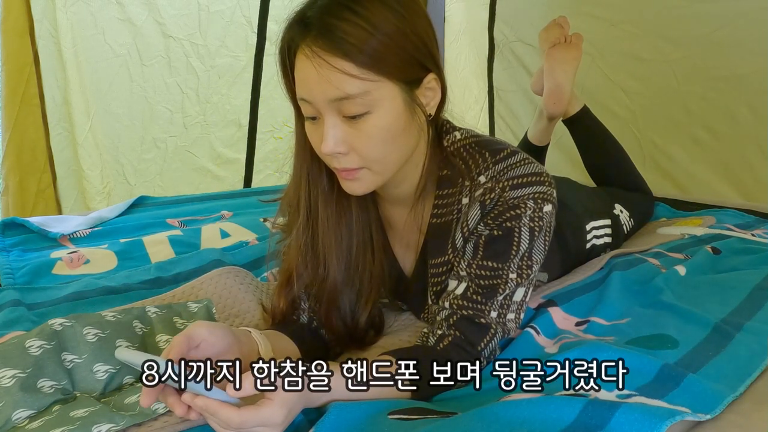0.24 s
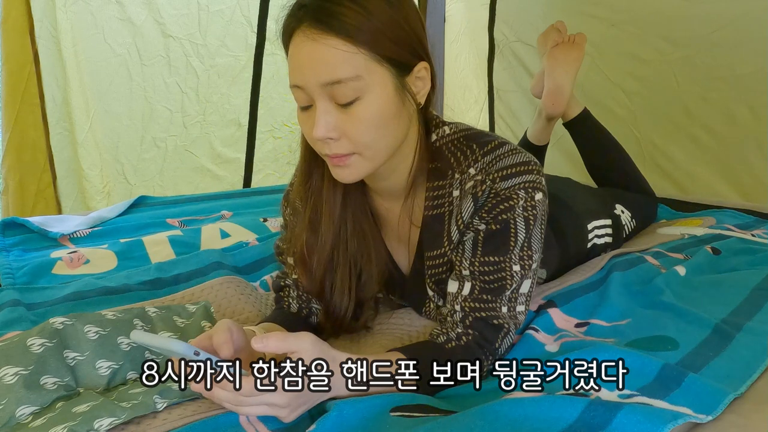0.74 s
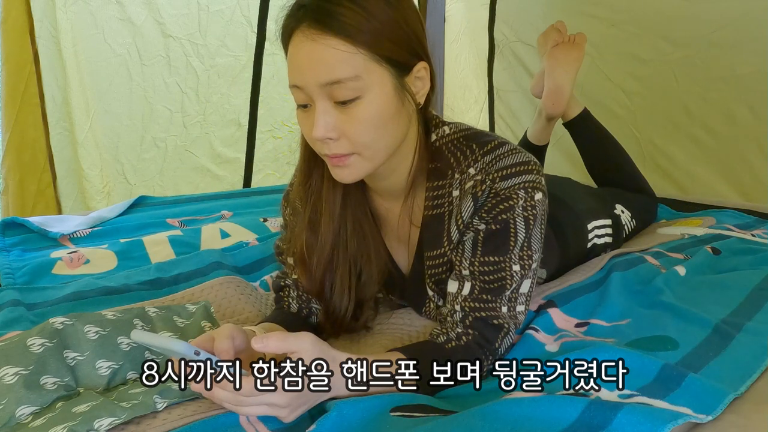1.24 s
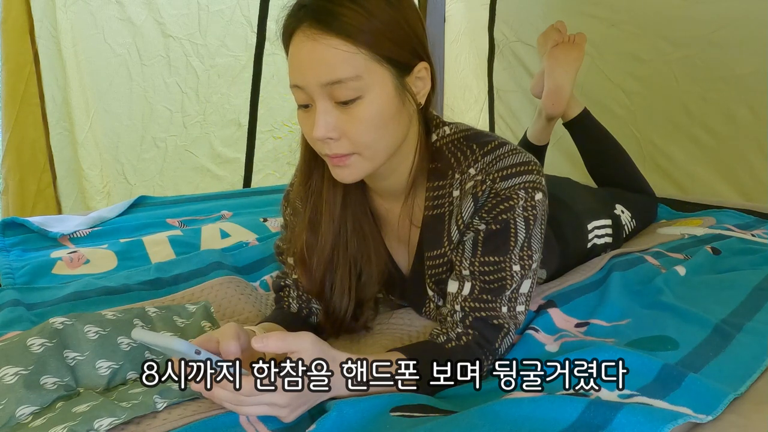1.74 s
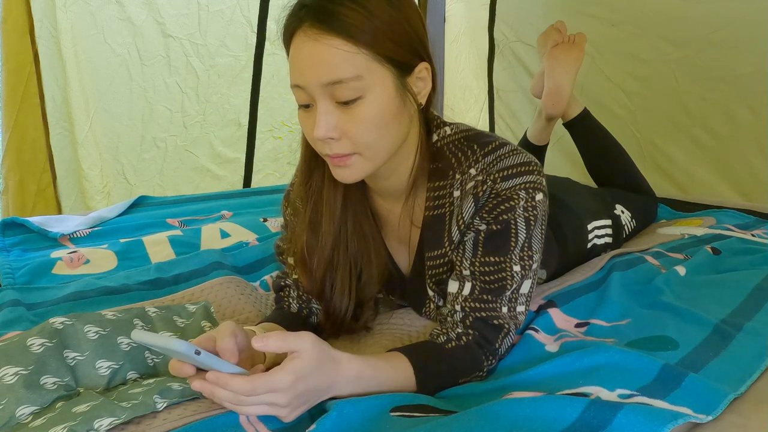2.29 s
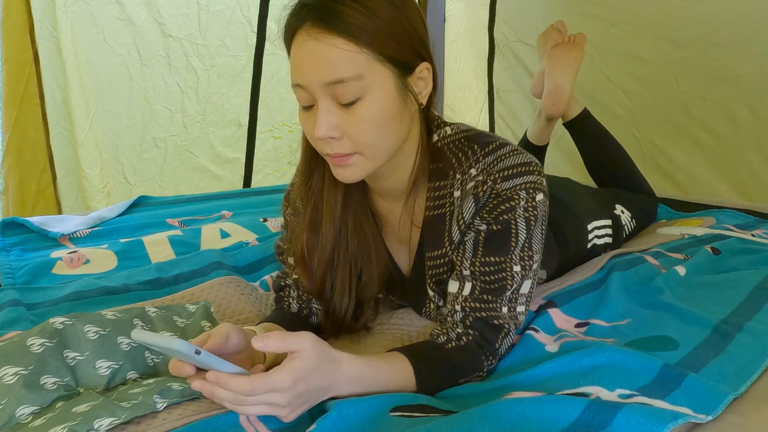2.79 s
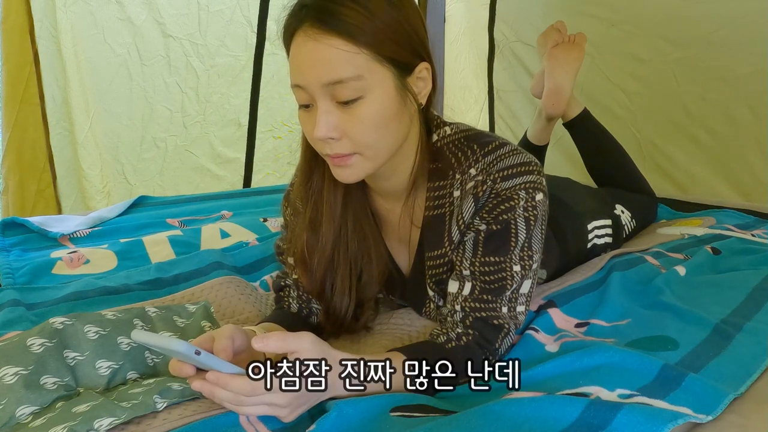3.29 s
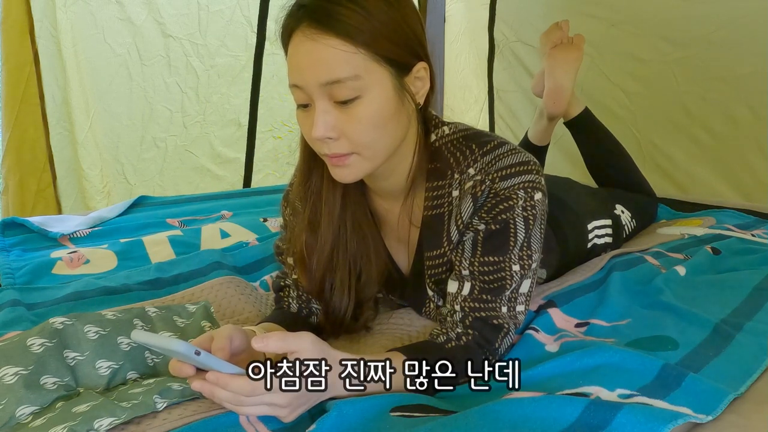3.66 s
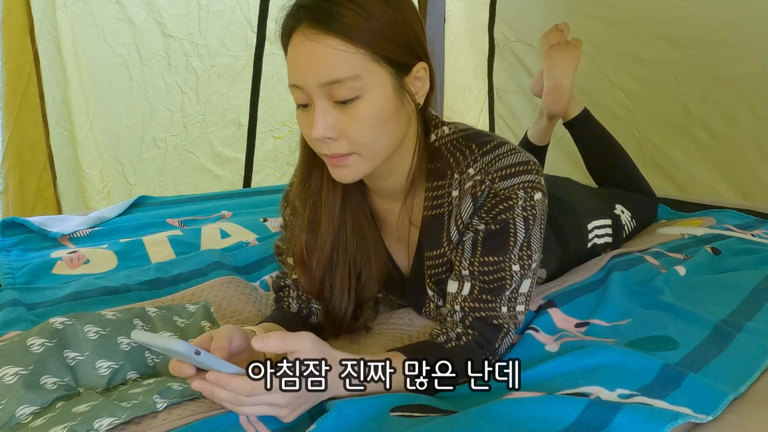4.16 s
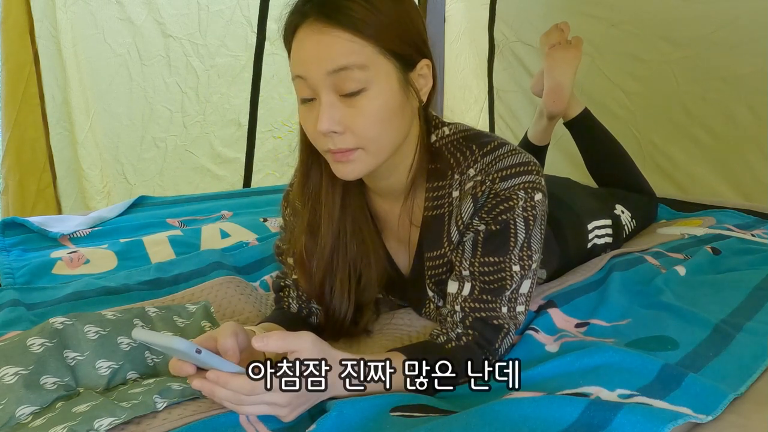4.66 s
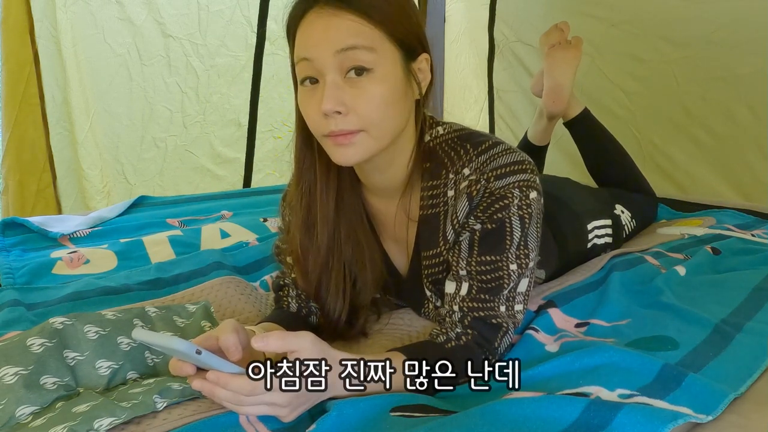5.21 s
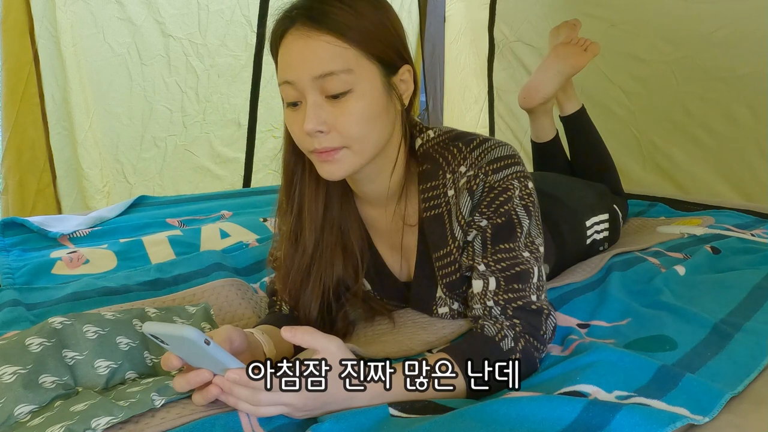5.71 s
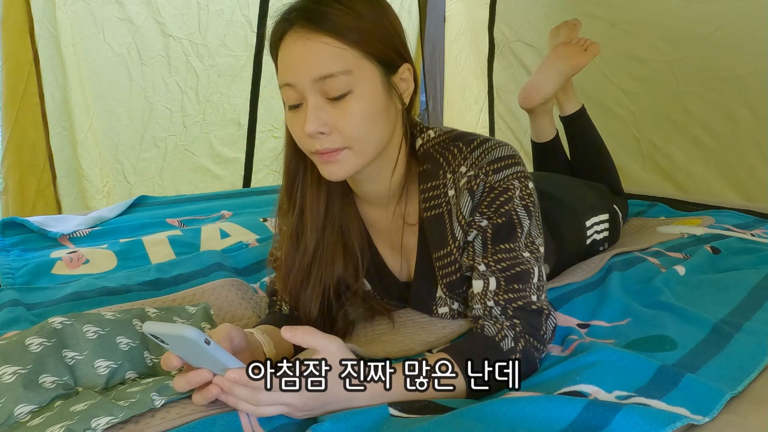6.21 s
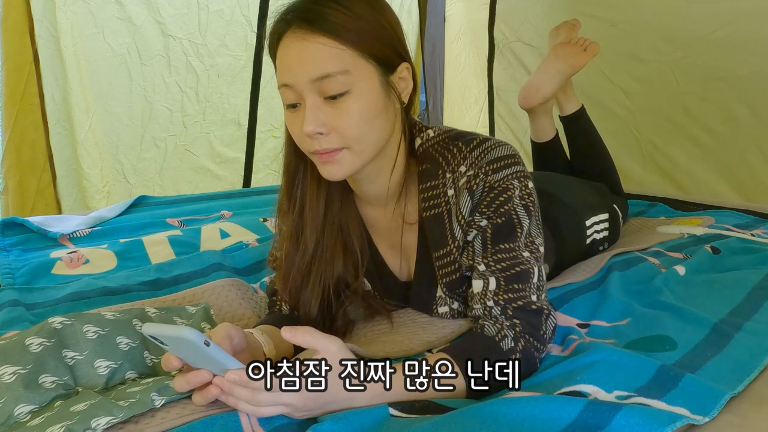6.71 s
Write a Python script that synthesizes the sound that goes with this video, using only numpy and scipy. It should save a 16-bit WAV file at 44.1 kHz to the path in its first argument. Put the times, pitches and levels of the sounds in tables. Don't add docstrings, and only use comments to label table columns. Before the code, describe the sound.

From inside a tent, sharp sliding bird chirps ring through nearby trees while low wind puffs and far traffic murmur softly.

```python
import sys
import numpy as np
from scipy import signal
from scipy.fft import rfft, irfft, next_fast_len
from scipy.io import wavfile
from scipy.ndimage import uniform_filter1d, map_coordinates

SR = 44100
rng = np.random.default_rng(int(sys.argv[2]) if len(sys.argv) > 2 else 0)


def store_pcm(level_fs):
    pcm = np.round(np.clip(level_fs, -1, 1) * 32767).astype(np.int16)
    wavfile.write(sys.argv[1], SR, np.atleast_2d(pcm).T)


def field_ratio(decibels):
    return 10 ** (np.asarray(decibels, dtype=float) / 20)


N = 306436


def unit(x):
    return x / np.sqrt(np.mean(x ** 2) + 1e-20)


def along(points, hz):
    f, v = np.transpose(points)
    return np.interp(np.log(hz + 1), np.log(f + 1), v)


def shape(points, u):
    return np.interp(u, *np.transpose(points))


def wobble(rate, size=N):
    knots = rng.standard_normal(int(size * rate / SR) + 4)
    return map_coordinates(knots, [np.arange(size) * rate / SR])


def coloured(x, spectrum):
    size = x.shape[-1]
    m = next_fast_len(size + 8192)
    gain = field_ratio(along(spectrum, np.fft.rfftfreq(m, 1 / SR)))
    return irfft(rfft(x, m) * gain, m)[..., :size]


def rush(spectrum, patchy_db, size=(5, 12)):
    z = signal.stft(rng.standard_normal(N), nperseg=512)[2]
    field = uniform_filter1d(rng.standard_normal(z.shape), size[0], 0)
    field = uniform_filter1d(field, size[1], 1)
    patchy = signal.istft(z * field_ratio(patchy_db * unit(field)), nperseg=512)[1][:N]
    return unit(coloured(patchy, spectrum))


def add(track, s, x):
    part = track[round(s * SR):][:len(x)]
    part += x[:len(part)]


def whistle(hz, db, octave_db, waver, steady=0.27, third_db=-9):
    trembling_hz = hz * (1 + waver * wobble(498.6, size=len(hz)))
    phase = 2 * np.pi * np.cumsum(trembling_hz) / SR
    grit = unit(steady + wobble(1500, size=len(hz)))
    overtones = np.sin(2 * phase) + field_ratio(third_db) * np.sin(3 * phase)
    return field_ratio(db) * np.sqrt(2) * (np.sin(phase) + field_ratio(octave_db) * grit * overtones)


SLIDE = [(.6, .99), (.71, .96), (.77, .8), (.86, .67), (.96, .57), (1.03, .34)]


def chirp_pitch(u, top_hz, higher_hz):
    shoulder_hz = 4630 + .55 * higher_hz
    closing_in = np.exp(-np.clip(u + 0.00985, 0, 1) / .097)
    shoot = shoulder_hz * (1.04 - .57 * closing_in)
    climbed = np.sin(np.pi / 2 * np.clip((u - .28) / .34, 0, 1)) ** 1.3
    hz = (1 - climbed) * shoot + climbed * top_hz * shape(SLIDE, u)
    return uniform_filter1d(hz, size=250)


# (time [share of chirp], level [dB])
AIRFLOW = [(-.16, -12), (-.07, 2.5), (.05, 4), (.2, -3.5), (.7, -4), (.95, 5.5), (1.03, -23)]
# (frequency [Hz], level [dB per Hz])
RASP = [(1200, -22), (2000, 11.5), (3000, -5), (4500, 0), (6000, -5.5), (8000, -6.5), (11000, -16),
        (14000, -32)]


def breath(u, db):
    return field_ratio(db + shape(AIRFLOW, u)) * unit(coloured(rng.standard_normal(len(u)), RASP))


# (time [share of chirp], level [dB])
EFFORT = [(-.1, -60), (-.02, -14), (.03, -8), (.25, -5.5), (.6, -14.5), (.72, -7), (.79, -6), (.98, -8),
          (1.03, -17)]


def chirp(length, top_hz, rise_db, fall_db, ends_db, top_db, unsteady, echo_db):
    higher_hz = top_hz - 5600
    push_db = rise_db - -42
    octave_db = -25 + 1.56 * push_db
    rasp_db = -22 + 0.67 * push_db
    shoulder = .047 / length
    turn = min((.121 + higher_hz / 60000) / length, .94)
    u = np.arange(SR // 4) / (length * SR) - .16
    u = np.interp(u, [-1, 0, shoulder, turn, 1, 2], [-1, 0, .3, .76, 1, 2])
    hz = chirp_pitch(u, top_hz, higher_hz)
    db = np.interp(u, [.45, .75], [rise_db, fall_db])
    rasp = breath(u, db + rasp_db)
    db = db + shape(EFFORT, u) + ends_db * np.clip((3900 - hz) / 900, 0, 1)
    at_top = np.exp(-((u - .62) / .12) ** 2)
    tone = whistle(hz, db + top_db * at_top, octave_db, unsteady + .025 * at_top)
    call = (u < EFFORT[-1][0]) * (tone + rasp)
    return call + field_ratio(echo_db) * np.roll(call, round(.024 * SR))


def short_note(length, from_hz, to_hz, db):
    u = np.clip(np.arange(SR // 8) / (length * SR), 0, 1)
    octave_db = -5 if from_hz < 3750 else -17
    hz = from_hz + (to_hz - from_hz) * u
    note = whistle(hz, db, octave_db, waver=.01, steady=3, third_db=-12)
    return np.abs(np.sin(np.pi * u)) ** .5 * note


# (frequency [Hz], decay by 60 dB [s])
TREES = [(2000, 0.073), (5000, 0.78), (10000, 0.81)]


def scattered(x, direct_db, near_db=1, mid_db=-2, mid_t60=0.46, far_db=-5):
    hz, t, z = signal.stft(rng.standard_normal(SR), SR, nperseg=256)
    decay = field_ratio(-60 * t / along(TREES, hz)[:, None])
    far = signal.istft(z * decay, SR, nperseg=256)[1][:SR]
    near_t60 = .09
    near, mid = rng.standard_normal((2, SR)) * field_ratio(-60 * np.arange(SR) / SR / [[near_t60], [mid_t60]])
    paths = field_ratio(near_db) * unit(near) + field_ratio(mid_db) * unit(mid) + field_ratio(far_db) * unit(far)
    out = signal.fftconvolve(x, paths / np.sqrt(SR))
    flicker = unit(1.1 + wobble(450, size=len(x)))
    add(out, 0, field_ratio(direct_db) * flicker * x)
    return out


# (time [s], length [s], top pitch [Hz], rise level [dB], fall level [dB])
CHIRPS = [(0.683, 0.15, 5400, -37.5, -46), (0.951, 0.13, 5964, -36.5, -35.5),
          (1.419, .16, 5590, -36, -36.5), (1.533, 0.165, 5475, -37, -38), (2.105, 0.16, 5785, -40.5, -39.5),
          (2.546, 0.15, 5860, -40, -40), (3.243, 0.16, 5646, -41.5, -43.5), (3.641, .18, 5260, -40.5, -38),
          (3.99, 0.16, 5820, -42, -43.5), (4.314, 0.18, 5870, -48.5, -52), (4.704, 0.16, 5530, -44, -41)]
# (direct path [dB], low ends [dB], top [dB], pitch waver [share], trunk echo [dB])
PERCHES = [
    (-6, -8.5, 2, 0.0168, -9.5),
    (-3.5, -1.5, -3.5, 0.0094, -16.5),
]
# (time [s], length [s], start pitch [Hz], end pitch [Hz], level [dB])
NOTES = [
    (0.695, 0.07, 3890, 4110, -51),
    (0.772, 0.0402, 4800, 5280, -45),
    (1.244, 0.096, 3590, 3513, -60.5),
    (2.538, 0.034, 4400, 4400, -61),
    (3.234, 0.043, 4350, 4420, -60),
    (3.986, 0.041, 4190, 4370, -53),
    (5.302, 0.038, 4260, 4180, -65),
]
# (frequency [Hz], gain [dB])
BEAK = [(1500, -16), (2200, -11.5), (3000, -4.5), (4500, 2.5), (5500, -1), (6300, -8), (8000, -14),
        (11000, -18.5), (14000, -24)]


def birds():
    track = np.zeros(N)
    for s, length, top_hz, rise_db, fall_db in CHIRPS:
        direct_db, *perch = PERCHES[int(s > 2)]
        call = chirp(length, top_hz, rise_db, fall_db, *perch)
        add(track, s - .16 * length, scattered(call, direct_db))
    for s, *note in NOTES:
        add(track, s, scattered(short_note(*note), direct_db=3.5))
    return coloured(track, BEAK)


# (time [s], level [dB], centre [Hz], decay by 60 dB [s])
RUSTLES = [
    (.361, -66, 3000, .012),
    (0.677, -52.5, 4300, 0.43),
    (1.655, -50, 350, 0.084),
    (5.287, -54, 3550, 0.2),
    (5.303, -57, 3470, 0.4),
    (5.69, -47.5, 325, 0.12),
    (6.3, -59, 332, 0.39),
]


def fabric():
    track, t = np.zeros(N), np.arange(SR // 2) / SR
    for s, db, hz, t60 in RUSTLES:
        band = [(hz / 2.6, -40), (hz / 1.5, 0), (hz * 1.2, -2), (hz * 2, -14), (hz * 2.8, -40)]
        cloth = unit(coloured(rng.standard_normal(len(t)), band))
        onset = 1 - np.exp(-t / 0.0081)
        add(track, s, field_ratio(db - 60 * t / t60) * onset * cloth)
    return track


def curve(rows):
    return shape(rows, np.arange(N) / SR)


# (time [s], level [dB], hold [s])
PUFFS = [(0, -46.5, 0), (.17, -52, 0), (.31, -47.5, 0), (0.489, -43.5, 0.1), (0.768, -38.5, 0),
         (1.11, -41.5, 0.0031), (1.402, -44.5, 0.37), (2.32, -41.5, 0), (3.17, -37, 0.028),
         (3.264, -43.5, 0.073), (3.602, -47.5, 0.11), (3.95, -44.5, 0), (4.24, -50.5, 0),
         (4.35, -48.5, 0.0037), (4.68, -50, 0.018), (4.91, -45, 0.0081), (5.17, -49, 0.051),
         (5.46, -49.5, 0), (6.5, -57, 0.01), (6.665, -54, 0.011), (6.87, -53, 0.023)]
# (time [s], level [dB])
BREEZE = [(0, -53.5), (2.5, -52.5), (3.05, -56.5), (6.95, -61.5)]
# (frequency [Hz], level [dB per Hz])
THUMP = [(8.8, -35), (15, -6), (65, -6), (76, -4), (92, -21), (110, -9), (140, -21.5), (240, -120)]


def wind():
    lumps = unit(field_ratio(2.6 * wobble(25)) * rush(THUMP, patchy_db=2.0))
    t, strength_db = np.arange(N) / SR, curve(BREEZE)
    for s, db, hold in PUFFS:
        away_db = np.maximum(193 * (s - t), 174 * (t - s - hold))
        strength_db = np.maximum(strength_db, db - np.maximum(away_db, 0))
    return field_ratio(strength_db) * lumps


# (frequency [Hz], level [dB per Hz])
LEAVES = [(1400, -51), (2400, 3.5), (2700, 0.5), (3600, 0.5), (4800, 5.5), (6200, 3.5), (7000, -5),
          (8200, -15.5), (10000, -16), (13000, -20), (16000, -57)]


def leaves():
    return field_ratio(-69 + 0.23 * wobble(1.7)) * rush(LEAVES, patchy_db=1.4)


def passes(rows):
    t = np.arange(N) / SR
    return np.sqrt(sum(field_ratio(2 * db) / (1 + ((t - s) / width) ** 2) ** 2 for s, db, width in rows))


# (time [s], level [dB])
PASSING = [
    (0.0, -54),
    (0.008, -45),
    (0.294, -43.5),
    (0.332, -49.5),
    (0.36, -44),
]
# (frequency [Hz], level [dB per Hz])
CAR = [(290, -39), (500, -17), (582, -24), (862, -10), (924, -3), (1170, -2), (1380, -3.5), (1540, -15.5),
       (2600, -38.5), (3380, -72), (5720, -120)]


def nearer_car():
    heard = np.arange(N) < .363 * SR
    return field_ratio(curve(PASSING) - 2.0) * heard * rush(CAR, patchy_db=1.5, size=(2, 14))


# (time [s], level [dB])
TRAFFIC = [(0, -54.5), (5.2, -56.5), (6.95, -58.5)]
# (frequency [Hz], level [dB per Hz])
TYRES = [(250, -32.5), (420, -17), (615, -10), (761, -13.5), (847, -10.5), (1030, -0.5), (1390, 0),
         (2050, -15.5), (2600, -32), (3380, -56), (5720, -120)]
# (time nearest [s], level [dB], half width [s])
LORRIES = [
    (.38, -75, .05),
    (2.7, -63.5, 0.51),
    (3.8, -61.5, 1),
    (5.72, -56, 0.034),
    (6.2, -64.5, 0.23),
]
# (frequency [Hz], level [dB per Hz])
HEAVY = [(450, -46), (620, -9.5), (780, 5), (950, -5), (1300, -46)]


def tyres():
    lorries = field_ratio(-3.5) * passes(LORRIES) * rush(HEAVY, patchy_db=2.5)
    return field_ratio(curve(TRAFFIC)) * rush(TYRES, patchy_db=1.26) + lorries


# (time nearest [s], level [dB], half width [s])
SURGES = [
    (.72, -55, 0.12),
    (5.72, -51, 0.045),
    (6.42, -47.5, .12),
]
# (frequency [Hz], level [dB per Hz])
ENGINES = [(56, -60), (95, -23.5), (144, 0), (183, 1), (231, -5), (259, -15.5), (445, -23), (520, -27.5),
           (680, -64.5), (1140, -120)]


def engines():
    return np.hypot(field_ratio(-54.5), passes(SURGES)) * rush(ENGINES, patchy_db=1.23)


# (frequency [Hz], level [dB per Hz])
HISS = [(200, -40), (400, -12), (700, -15), (5000, -16), (7000, -12.5), (9000, -13), (10800, -9.5),
        (11800, -0.5), (12600, -9), (15000, -14.5), (16500, -22)]


def hiss():
    pair = np.array([rush(HISS, patchy_db=1), rush(HISS, patchy_db=5.5)])
    return field_ratio(-80.5 + np.array([[1.1], [-1.1]])) * pair


def scene():
    heard = birds() + fabric() + wind() + leaves() + nearer_car() + tyres() + engines()
    return np.tile(heard, (2, 1))


def top_cut(x):
    return signal.sosfilt(signal.butter(12, 15720, fs=SR, output="sos"), x)


def record(dry):
    return top_cut(dry + hiss())


dry = scene()
out = record(dry)
store_pcm(out)
```